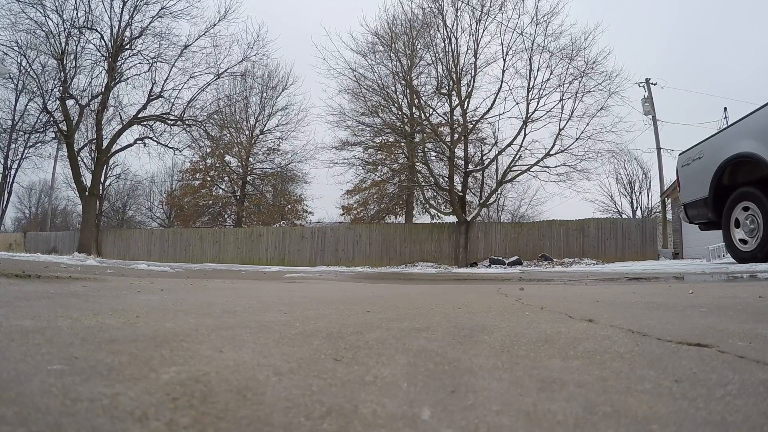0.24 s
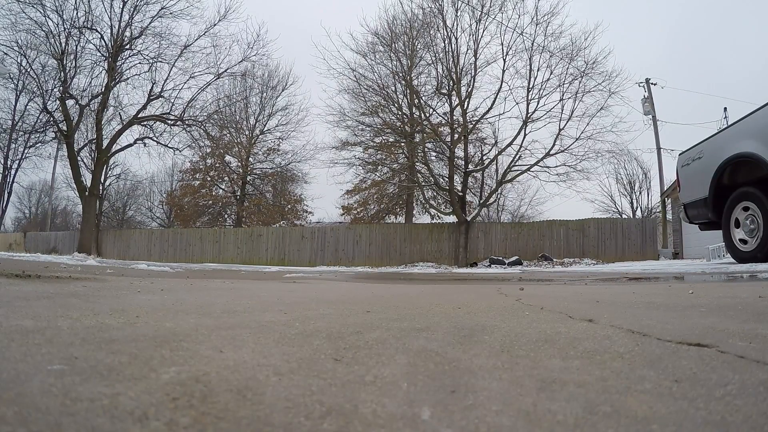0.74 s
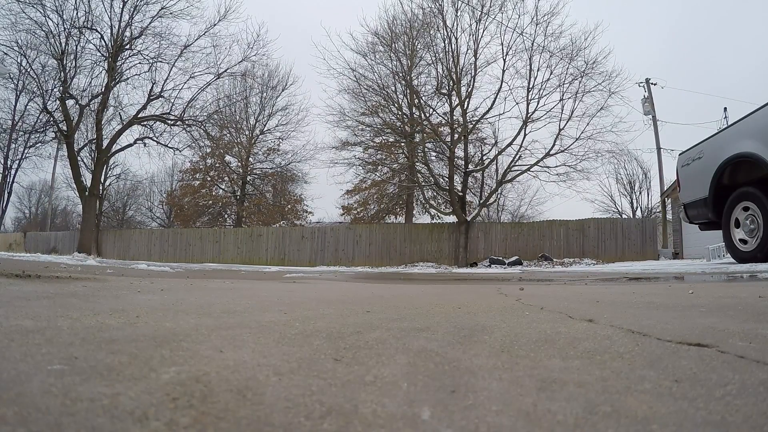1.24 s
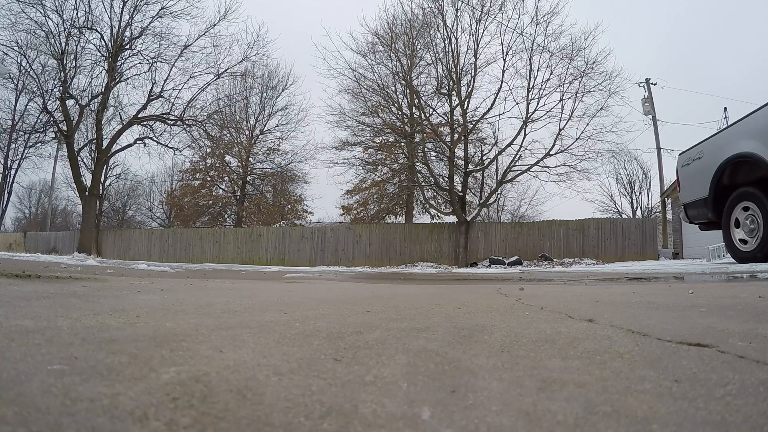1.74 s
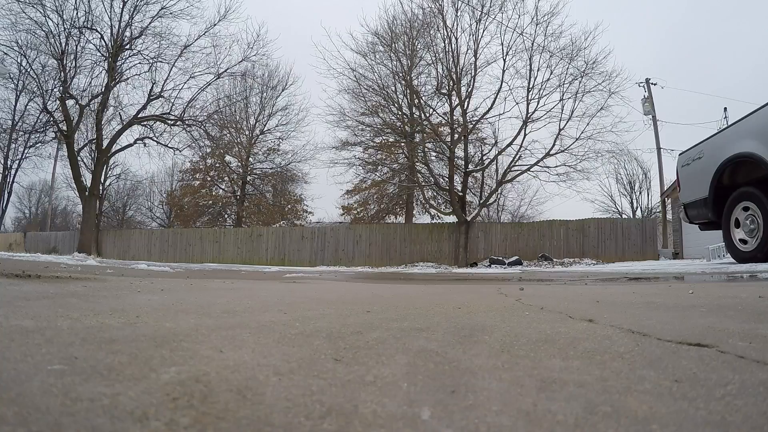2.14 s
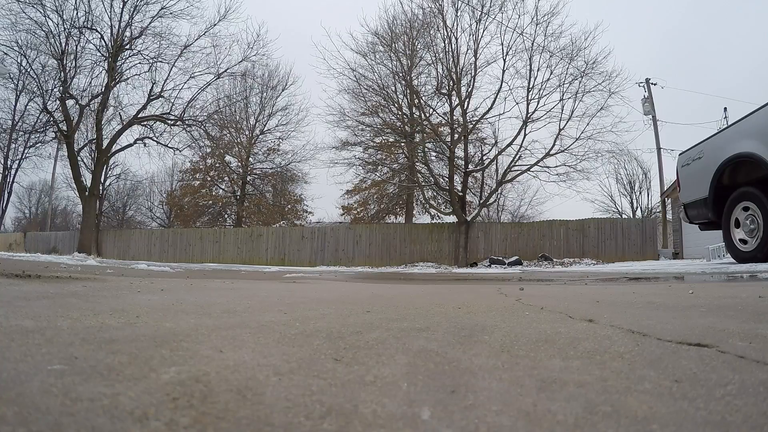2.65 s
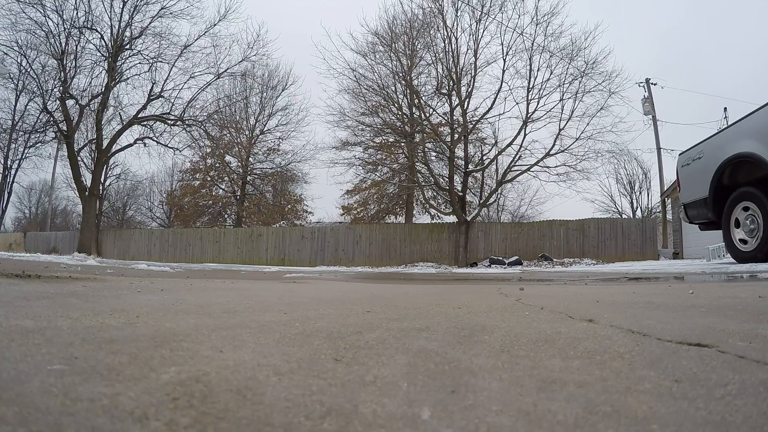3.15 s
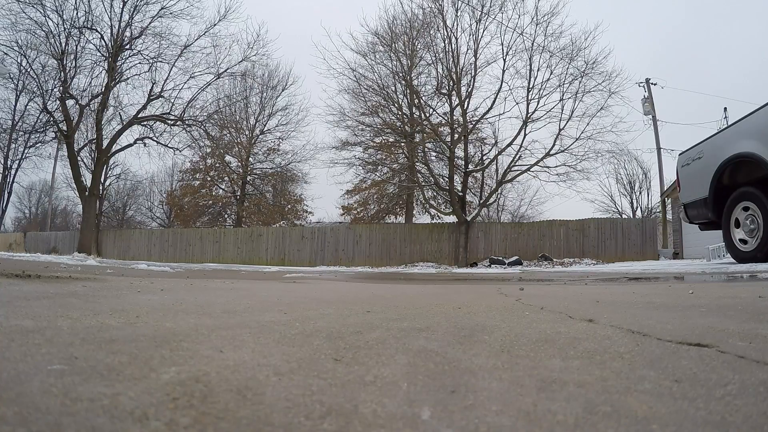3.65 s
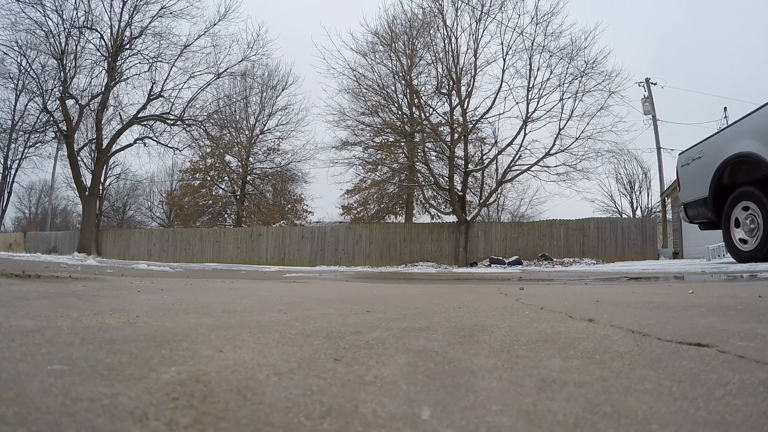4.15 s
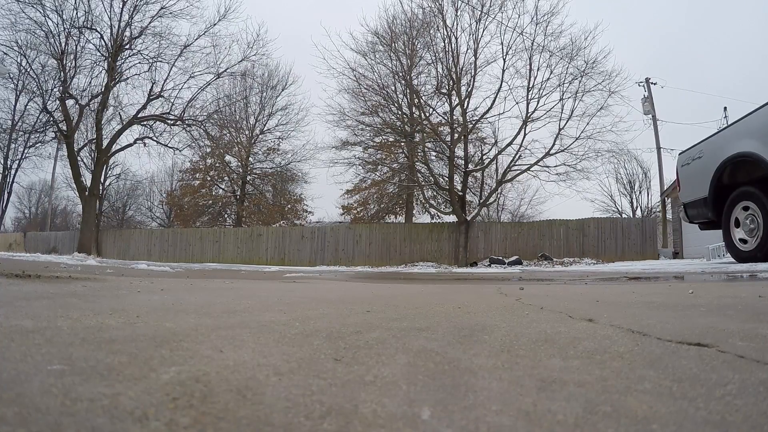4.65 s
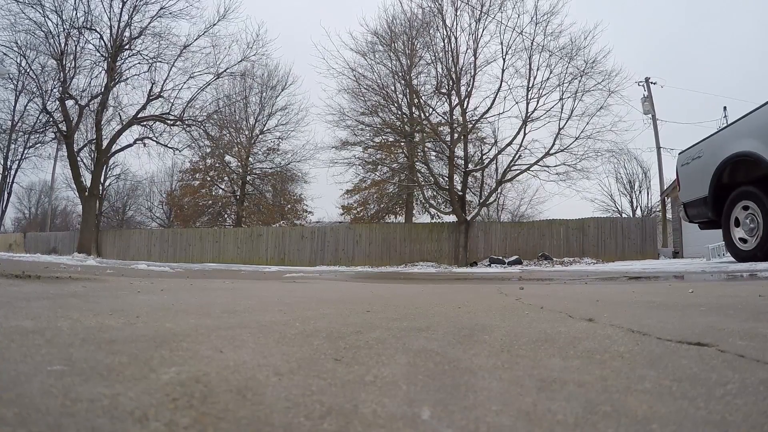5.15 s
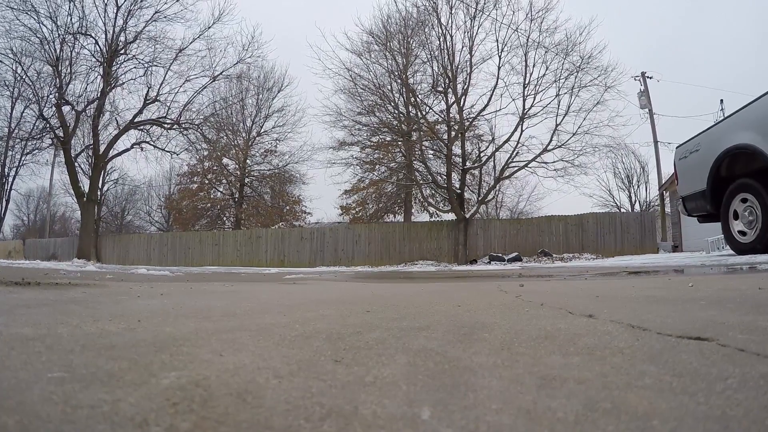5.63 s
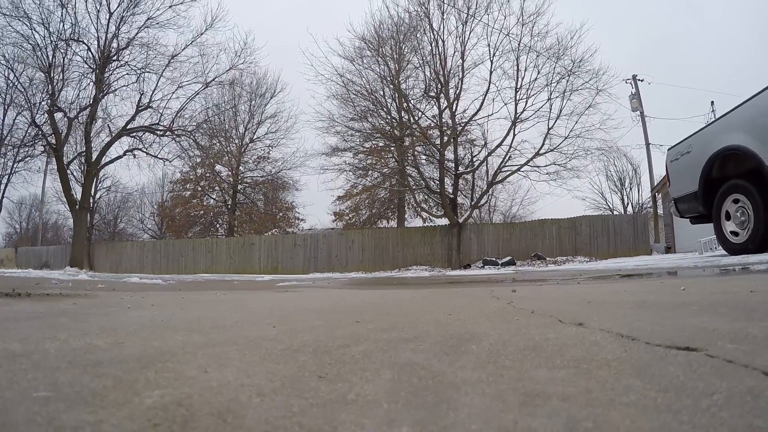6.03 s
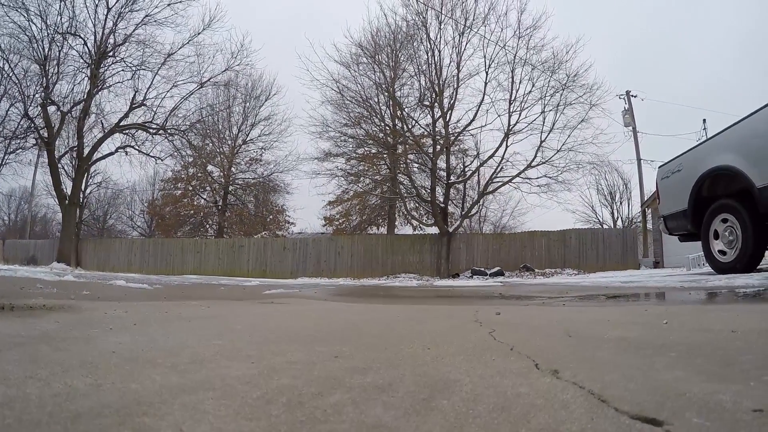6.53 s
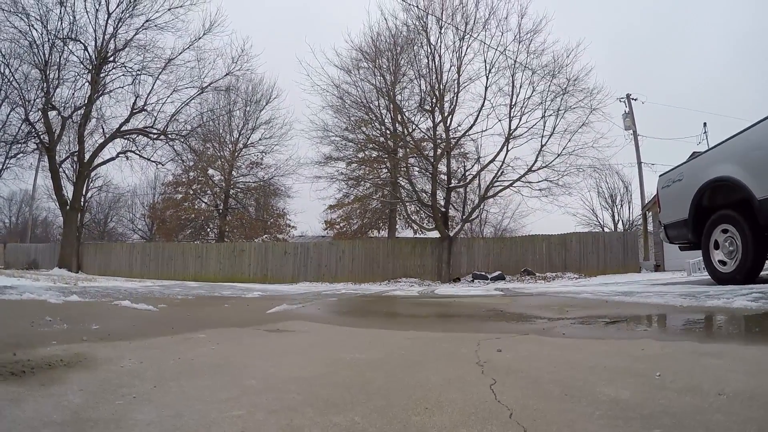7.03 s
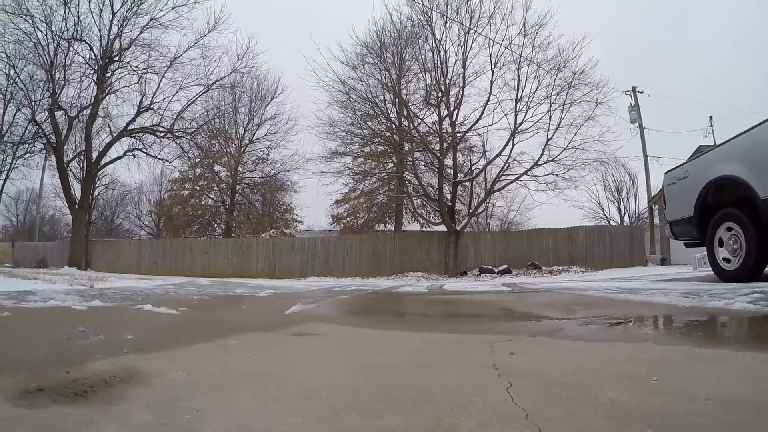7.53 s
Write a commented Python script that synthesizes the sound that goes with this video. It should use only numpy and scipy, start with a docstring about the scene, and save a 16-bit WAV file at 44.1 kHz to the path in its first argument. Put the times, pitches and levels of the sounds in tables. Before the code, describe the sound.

After a quiet moment and a plastic click, a small drone spins up suddenly and lifts off with a loud, rising, buzzing whine.

```python
"""On a quiet driveway a small quadcopter, with the microphone on its frame, clicks, spins up and lifts off.
Its blades radiate harmonics of their passing rate, and rotors of unequal speed beat. The motors start
with a rough surge of current and whistle around their switching tone. The turbulent downwash hisses and
buffets the microphone, easing once the craft is clear of the ground. Behind lie a rumble and a far hum."""
import sys
import numpy as np
from scipy import signal
from scipy.fft import rfft, irfft, next_fast_len
from scipy.io import wavfile
from scipy.ndimage import uniform_filter1d

SR = 44100
rng = np.random.default_rng(int(sys.argv[2]) if len(sys.argv) > 2 else 0)


def log_audio(samples):
    """Write samples as a 16-bit WAV file to the path given in sys.argv[1]."""
    # one column per channel
    frames = np.atleast_2d(samples).T
    # limit to full scale, then quantise
    limited = np.clip(frames, -1, 1)
    pcm = np.round(limited * 32767).astype(np.int16)
    wavfile.write(sys.argv[1], SR, pcm)


N = 343317
TIME = np.arange(N) / SR
START_S, CURRENT_RISE_S, SWITCH_HZ = 3.585, 0.0038, 7553

# Levels in the tables are relative.
# Harmonics of the blade-passing tone: blade_rate_multiple, level_db
BLADE_HARMONICS = [(1, -0.5), (2, -11.5), (3, -19), (4, -25.5), (5, -28), (6, -32.5), (7, -35), (8, -42),
                   (9, -39), (11, -56)]
# Harmonics of one unbalanced rotor: shaft_rate_multiple, level_db
IMBALANCE_HARMONICS = [(1, -14.5), (3, -26), (5, -32)]
# Speed the motors aim for: time_s, blade_rate_hz
THROTTLE = [(4.35, 210.3), (5.1, 217.2), (5.42, 226.6), (5.8, 252.3), (6.2, 256.5), (6.8, 274.5),
            (7.25, 277), (7.78, 297)]
# Balancing pushes on one rotor: peak_s, half_width_s, extra_blade_rate_hz
BALANCE_PUSHES = [(3.96, .19, 25), (4.36, .33, 2.3), (5.58, .16, 6.5), (5.83, .22, 12.2), (6.6, .05, 12.3),
                  (7.21, .18, 7.9), (7.56, .33, 20.4)]
# Magnetic tones: switching_multiple, blade_rate_multiple, level_db, full_load_gain_db, faster_motor_share
MAGNETIC_TONES = [(1, 7, -28, 13, .15), (1, 3.5, -44, 4, .3), (1, -1, -38, 4, .3), (1, 1, -45, 4, .3),
                  (1, -7.5, -40, 3, .3), (1, -9.5, -35, -4, .95), (1, -10.5, -43, 4, .3),
                  (1, -15, -41, 5, .3), (1, -18, -43, 24, .1), (2, -7, -33, 0, .3), (0, 21, -30, 11, .95),
                  (0, 10, -35, 0, .9)]
# Transmission of motor tones through the frame: frequency_hz, gain_db
FRAME_RESPONSE = [(1700, -29), (2300, 1.5), (2650, -7.5), (2900, 1.5), (3300, -15.5), (4400, -8),
                  (5200, -2), (5800, -12), (6500, -9), (7300, -6), (8200, 9), (9050, -2.5), (9600, -23),
                  (13500, -23), (15000, -10)]
# Climbing whines: start_s, climb_s, length_s, from_hz, to_hz, level_db
WHINES = [(5.35, .4, 2.49, 4700, 5280, -37), (5.82, .52, 2, 3850, 5170, -31.5),
          (7.12, .2, 0.25, 8170, 8280, -40)]
# Resonances of the frame: centre_hz, width_hz, gain_db
FRAME_MODES = [(220, 80, 2), (500, 90, -9.5), (1407, 160, -5.5), (2525, 280, -2.5), (2674, 380, 3),
               (5290, 1480, -3), (6180, 880, -9), (7500, 220, 1), (8270, 260, 7), (14300, 440, -10)]
# Spectrum of eddies on the microphone: frequency_hz, level_db
BUFFET_SPECTRUM = [(15, -14), (35, 0.5), (70, -3.5), (120, -8.5), (180, -14), (300, -19), (500, -27.5),
                   (750, -36), (1500, -30.5), (2500, -40.5), (3300, -58)]
# Spectrum of the blade-tip hiss: frequency_hz, level_db
HISS_SPECTRUM = [(150, -8), (500, 1.5), (1000, 3), (1600, 3), (2700, 4.5), (3300, -1), (4000, 1.5),
                 (5300, 1.5), (6300, -3), (7000, -2.5), (8300, 2.5), (9300, -2), (10800, -13), (15000, -6)]
# Gusts thrown back by the ground: peak_s, half_width_s, gain_db
GROUND_GUSTS = [(3.755, 0.036, 12), (4.42, 0.22, 3), (5.08, 0.11, 4), (6.2, 0.57, 2.5), (6.72, 0.073, 3.5)]
# Plastic clicks: start_s, level_db
CLICKS = [(1.127, -53), (2.7806, -38), (2.7818, -25), (2.793, -46), (2.8195, -47), (2.866, -50)]
# Spectrum of a click: frequency_hz, level_db
CLICK_SPECTRUM = [(150, -25), (330, -6), (500, 6.5), (800, 1.5), (1200, -7), (2100, -17), (2900, 4),
                  (3700, -1), (4700, -1), (5700, -20), (8000, -9), (11500, -13), (13300, -14), (15500, -19)]
# Spectrum of the outdoor air: frequency_hz, level_db
AIR_SPECTRUM = [(12, -36), (20, 1), (64, -1), (87, -11), (310, -24.5), (337, -23), (367, -22.5), (398, -28),
                (433, -24.5), (620, -26), (818, -27), (1240, -29), (1460, -33.5), (15000, -49.5)]
# Partials of a distant machine: pitch_hz, level_db
HUM_PARTIALS = [(366.1, -78), (495.3, -74), (554.5, -80), (608.3, -68), (1222, -72.5)]


def rotors(blade_db=-11.5, far_db=-18, slow_db=-2, spread_hz=7, hunt_hz=2.65, hunt_rate_hz=6, hunt_s=5.1):
    """Beating: two near rotors and their motors differ in speed; two fainter rotors wander around them."""
    slow, fast = blade_rates()
    # once the legs unload, the throttle hunts to keep the craft level
    hunt = hunt_hz * np.clip(TIME - hunt_s, 0, 1) * np.sin(turn(hunt_rate_hz + walk(3)))
    slow, fast = slow + hunt, fast + hunt
    blades = undb(slow_db) * propeller(slow, turn(slow), BLADE_HARMONICS)
    blades += propeller(fast, turn(fast), BLADE_HARMONICS)
    shaft_phase = turn(fast) / 2  # two blades pass per revolution
    blades += propeller(fast, shaft_phase, IMBALANCE_HARMONICS) * (fast / fast.max()) ** 2
    for speed_ratio in (.96, 1.03):
        hz = slow * speed_ratio + spread_hz * slow / slow.max() * walk(3.6)
        blades += undb(far_db) * propeller(hz, turn(hz), BLADE_HARMONICS[:3])
    return undb(blade_db) * blades + motors((slow, fast), torque())


def propeller(hz, phase, harmonics, bite_hz=72, sharp_hz=190, flutter_db=1.8, gust_db=1.76):
    """Periodic blade loading: harmonics swell and brighten with speed, and turbulence shakes them."""
    thrust = hz ** 4 / (hz ** 4 + bite_hz ** 4)
    brightness = np.clip(hz / sharp_hz, 0, 1)
    low_flutter, high_flutter = undb(flutter_db * walk(40)), undb(gust_db * walk(60))
    tone = 0
    for k, db in harmonics:
        flutter = low_flutter if k <= 2 else high_flutter
        tone += undb(db) * brightness ** min(k - 1, 2) * np.cos(k * phase) * flutter
    return thrust * tone


def blade_rates(spin_up_s=.212, lead_hz=1.5):
    """Inertia: the rotors run up gradually to the throttle; one leads, more so in balancing pushes."""
    aim_hz, = curves(THROTTLE)
    age = np.maximum(TIME - START_S, 0)
    run_up = 1 - np.exp(-(age / spin_up_s) ** 1.2)  # a power over 1 gives a sluggish first moment
    return aim_hz * run_up, (aim_hz + lead_hz) * run_up + swells(BALANCE_PUSHES)


def motors(rates, load, level_db=1.0, rough_db=1.0, strain_db=3.5):
    """Modulation: seven magnet pairs pass the coils, making tones and sidebands of the switching rate."""
    carrier = 2 * np.pi * SWITCH_HZ * TIME
    out = 0
    for hz, faster in zip(rates, (False, True)):
        phase = turn(hz) + (.005 + .05 * load) * walk(250)
        tones = 0
        for k, order, db, load_db, share in MAGNETIC_TONES:
            # each tone flares up as it glides through a resonance of the frame
            gain = undb(db + load_db * load) * colour(FRAME_RESPONSE, k * SWITCH_HZ + order * hz)
            tones += (share if faster else 1 - share) * gain * np.sin(k * carrier + order * phase)
        # ragged under load, cleaner at speed
        out += tones * undb((rough_db + strain_db * load) * walk(200))
    return undb(level_db) * out * ramp(START_S, CURRENT_RISE_S)


def torque(first=.4, peak=0.61, cruise=0.077, attack_s=.05, hold_s=0.23, release_s=0.037):
    """Inertial load, 0 to 1: high while the rotors gather speed, light afterwards."""
    age = np.maximum(TIME - START_S, 0)
    pull = first + (peak - first) * np.minimum(age / attack_s, 1)
    return cruise + (pull - cruise) * np.exp(-np.maximum(age - hold_s, 0) / release_s)


def motor_whines(flicker_db=4.0, jitter_hz=12, waver_hz=80, stray_hz=50, waver_rate_hz=6.2, fade_s=0.082):
    """Frequency modulation: thin whines climb at take-off, then waver as the craft balances."""
    out = 0
    for start_s, climb_s, length_s, from_hz, to_hz, db in WHINES:
        waver = waver_hz * np.sin(turn(waver_rate_hz + walk(3))) + stray_hz * walk(9)
        hz = from_hz + ramp(start_s, climb_s) * (to_hz - from_hz + waver)
        envelope = ramp(start_s, fade_s) - ramp(start_s + length_s, fade_s)
        gain = envelope * colour(FRAME_RESPONSE, hz) * undb(db + flicker_db * walk(50))
        out += gain * np.sin(turn(hz + jitter_hz * walk(150)))
    return out


def switching_tone(tone_db=-29.5, octave_db=-31.0, inrush_db=10, octave_inrush_db=4, inrush_s=.19,
                   octave_open_db=-12.5, drift_hz=3, flicker_db=3.0, octave_flicker_db=4.0):
    """Forced vibration: chopped current makes the coils sing, loudest during the inrush."""
    inrush = np.exp(-((TIME - START_S) / inrush_s) ** 2)
    aim_hz, = curves(THROTTLE)
    throttle_opening = (aim_hz - aim_hz.min()) / np.ptp(aim_hz)
    phase = turn(SWITCH_HZ + drift_hz * walk(50))
    tone = undb(tone_db + inrush_db * inrush + flicker_db * walk(70)) * np.sin(phase)
    octave_level = octave_db + octave_inrush_db * inrush + octave_open_db * throttle_opening
    octave = undb(octave_level + octave_flicker_db * walk(70)) * np.sin(2 * phase + .8 * walk(150))
    return (tone + octave) * ramp(START_S, CURRENT_RISE_S)


def current_surge(level_db=-16, attack_s=0.002, hold_s=0.021, decay_s=0.13, rough_db=2):
    """Resonance: until the motors lock in, ragged jolts of current excite the modes of the frame."""
    jolts = rng.standard_normal(N) * undb(rough_db * walk(500))
    ring = sum(undb(db) * band(band(jolts, hz, width), hz, width) for hz, width, db in FRAME_MODES)
    age = TIME - START_S
    envelope = np.clip(age / attack_s, 0, 1) * np.exp(-np.maximum(age - hold_s, 0) / decay_s)
    return undb(level_db) * unit(ring) * envelope


def downwash(buffet_db=-18, hiss_db=-27.5, clear_buffet_db=-13, clear_hiss_db=-2,
             eddy_db=1.1, flicker_db=0.85, pulse_depth=0.14, rumble_hz=130, full_wash_hz=205):
    """Turbulence: eddies buffet the microphone and blade tips hiss, both growing with rotor speed."""
    slow, fast = blade_rates()
    wash = np.clip(slow / full_wash_hz, 0, 1)
    clear = ramp(start_s=6.61, length_s=0.42)  # the craft leaves its own ground wash
    eddies = noise(BUFFET_SPECTRUM)
    rumble = signal.sosfiltfilt(signal.butter(2, rumble_hz, fs=SR, output="sos"), eddies)
    # slow air only rumbles; small eddies come with speed
    eddies = rumble + (eddies - rumble) * wash ** 3
    buffet_level = buffet_db + swells(GROUND_GUSTS) + clear_buffet_db * clear + eddy_db * walk(25.04)
    buffet = eddies * wash ** 1.8 * undb(buffet_level)
    hiss = noise(HISS_SPECTRUM) * wash ** 3.2
    hiss *= undb(hiss_db + clear_hiss_db * clear + flicker_db * walk(60))
    blade_pulses = 1 + pulse_depth * np.cos(turn(fast))
    return buffet + hiss * blade_pulses


def plastic_clicks(decay_s=0.0019, tail_db=-23, tail_s=0.018):
    """Damping: each plastic snap dies away exponentially and leaves a faint ring."""
    envelope = np.zeros(N)
    for start_s, db in CLICKS:
        age = np.maximum(TIME - start_s, 0)
        decay = np.exp(-age / decay_s) + undb(tail_db) * np.exp(-age / tail_s)
        envelope += (TIME >= start_s) * undb(db) * decay
    snaps = envelope * rng.standard_normal(N)
    return shaped(snaps, CLICK_SPECTRUM) * snaps.std()


def outdoor_background(air_db=-49.5, sway_db=-0.5, hum_db=1):
    """Ambient noise: a low rumble sways beneath the partials of a far-off machine."""
    air = noise(AIR_SPECTRUM)
    rumble = band(air, hz=50, width_hz=110)
    hum = sum(undb(db + 2.3 * walk(5.05)) * np.sin(turn(hz + 2.5 * walk(15))) for hz, db in HUM_PARTIALS)
    sway = rumble * (undb(sway_db * walk(9.1)) - 1)
    return undb(air_db) * (air + sway) + undb(hum_db) * hum


def undb(db):
    """Decibels to amplitude ratio."""
    return 10 ** (np.asarray(db) / 20)


def unit(x):
    """Normalisation to rms 1."""
    return x / np.sqrt(np.mean(x ** 2))


def curves(table):
    """Linear interpolation of a table's columns over time."""
    times, *columns = np.transpose(table)
    return [np.interp(TIME, times, column) for column in columns]


def ramp(start_s, length_s):
    """A raised-cosine step from 0 to 1."""
    return .5 - .5 * np.cos(np.pi * np.clip((TIME - start_s) / length_s, 0, 1))


def swells(table):
    """A sum of Gaussian swells, one for each row."""
    return sum(size * np.exp(-((TIME - peak_s) / half_s) ** 2) for peak_s, half_s, size in table)


def walk(rate_hz):
    """Smooth random fluctuation with a spread near 1."""
    hold = max(int(SR / rate_hz), 1)
    steps = np.repeat(rng.standard_normal(N // hold + 1), hold)
    return 1.3 * uniform_filter1d(uniform_filter1d(steps, hold), hold)[:N]


def turn(hz):
    """Phase in radians, the integral of frequency."""
    return 2 * np.pi * np.cumsum(hz) / SR


def band(x, hz, width_hz):
    """A second-order resonance, gain 1 at its centre."""
    return signal.lfilter(*signal.iirpeak(min(hz, SR / 2 - 1), hz / width_hz, fs=SR), x)


def colour(spectrum, hz):
    """Frequency response: the gain of a spectrum at the given frequencies."""
    points, db = np.transpose(spectrum)
    return undb(np.interp(hz, points, db))


def shaped(x, spectrum):
    """Filtering by a spectrum that rolls off beyond its ends, at rms 1."""
    hz, db = np.transpose(spectrum)
    size = next_fast_len(N, True)
    bins_hz = np.maximum(np.arange(size // 2 + 1) * SR / size, 1)
    gain = undb(np.interp(np.log(bins_hz), np.log(hz), db))
    roll_off = np.minimum(bins_hz / hz[0], 1) * np.minimum(hz[-1] / bins_hz, 1) ** 2
    return unit(irfft(rfft(x, size) * gain * roll_off, size)[:N])


def noise(spectrum):
    """Coloured noise of rms 1."""
    return shaped(rng.standard_normal(N), spectrum)


def scene():
    """Superposition: all sources add at the one microphone."""
    craft = rotors() + motor_whines() + switching_tone() + current_surge() + downwash()
    return (craft + plastic_clicks() + outdoor_background())[None]


def record(dry):
    """Saturation and band limiting: the camera rounds the highest peaks and cuts the top."""
    ceiling, cutoff_hz = .95, 15250
    rounded = dry / (1 + (dry / ceiling) ** 6) ** (1 / 6)
    return signal.sosfilt(signal.ellip(10, .1, 80, cutoff_hz, fs=SR, output="sos"), rounded)


dry = scene()
out = record(dry)
log_audio(out)
```